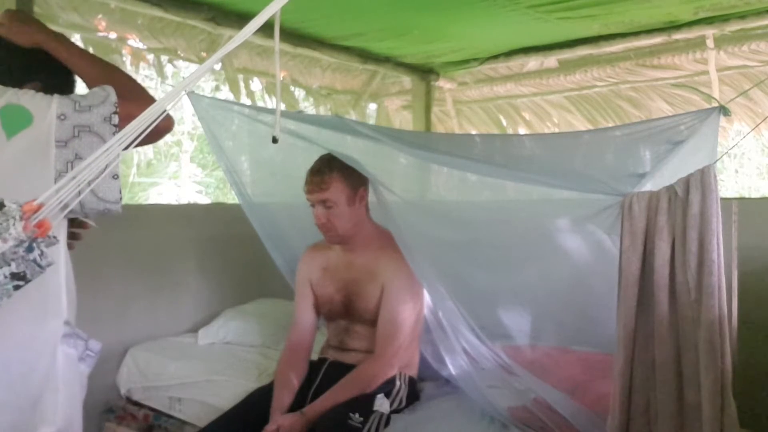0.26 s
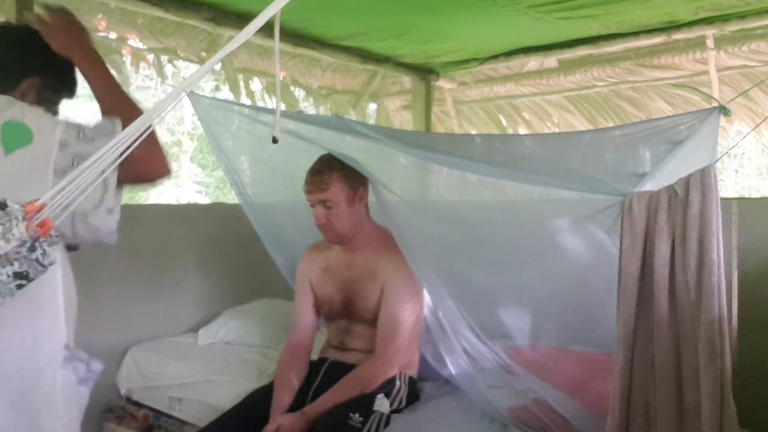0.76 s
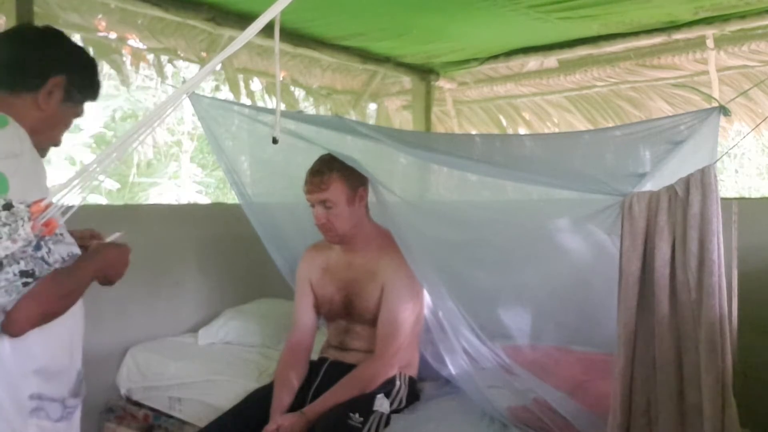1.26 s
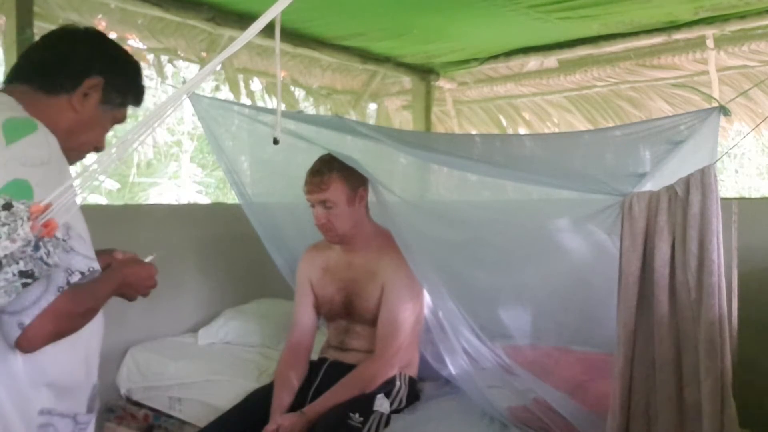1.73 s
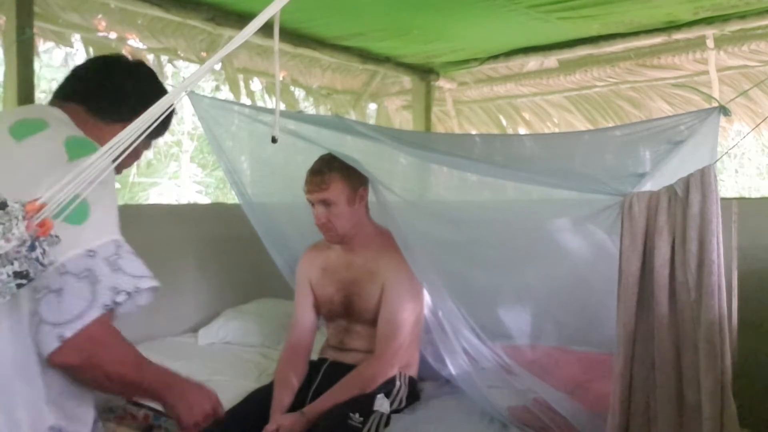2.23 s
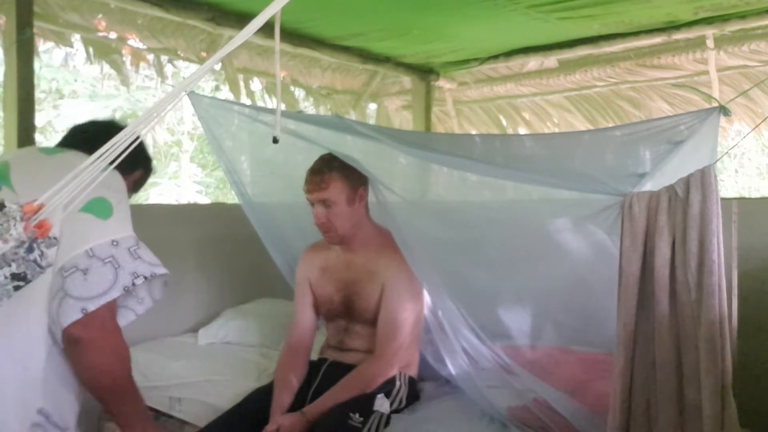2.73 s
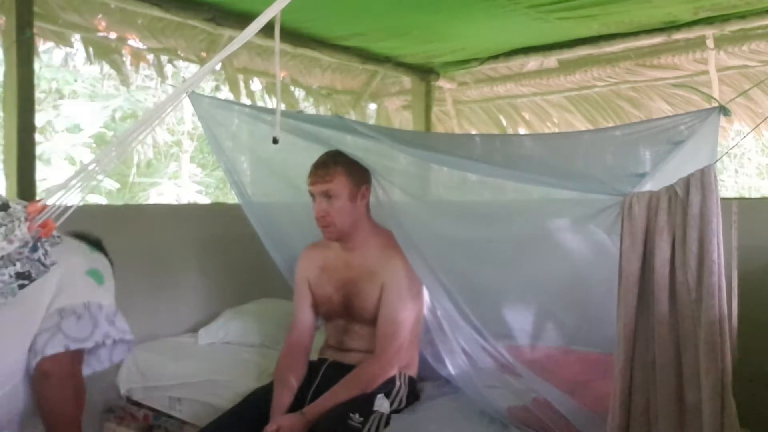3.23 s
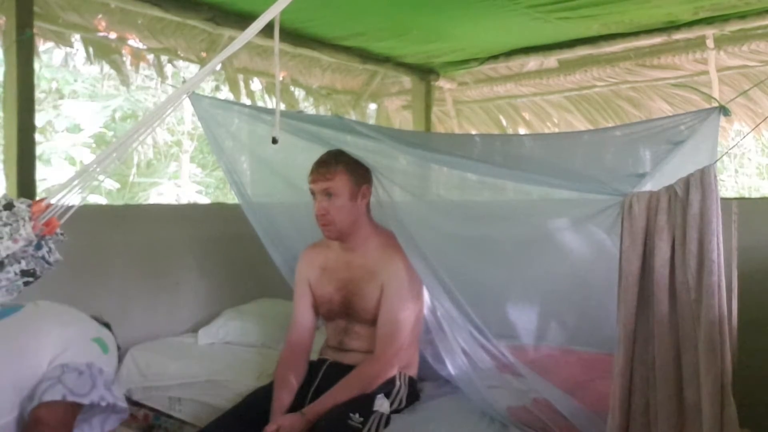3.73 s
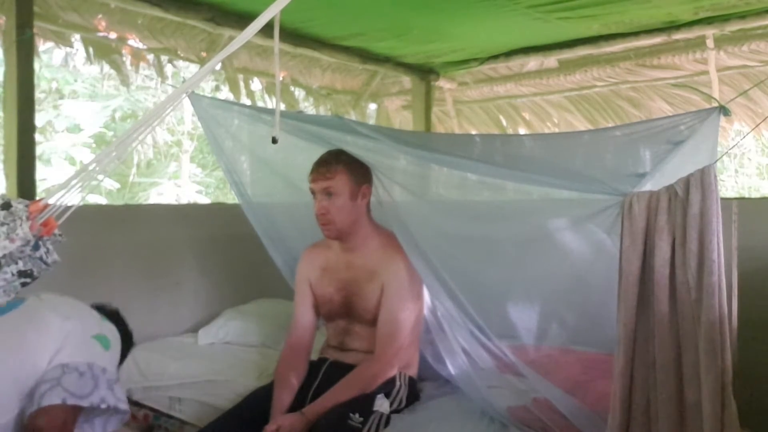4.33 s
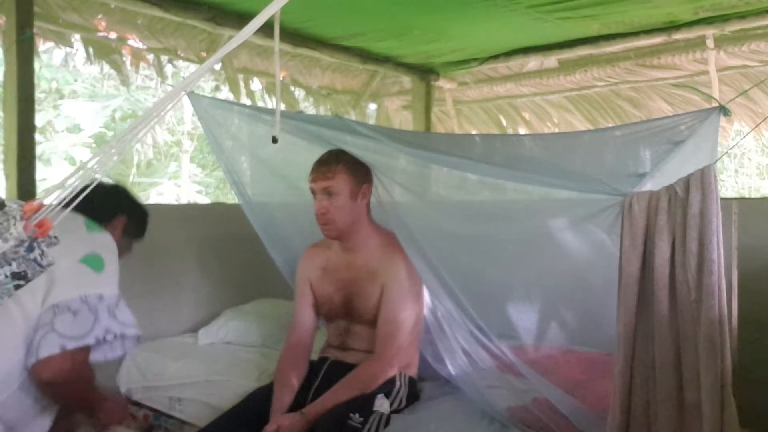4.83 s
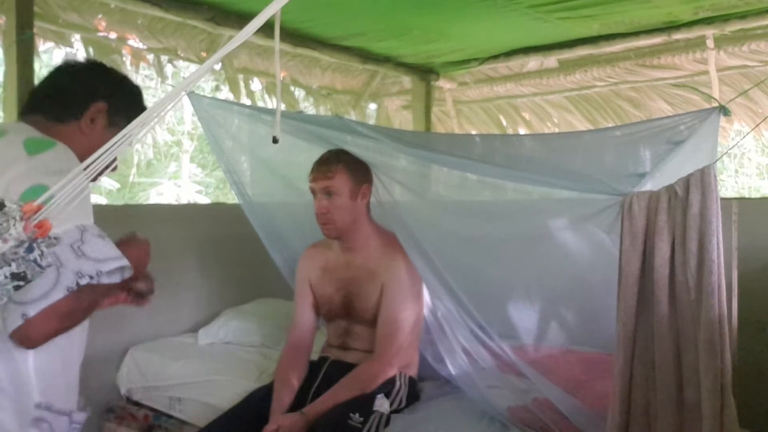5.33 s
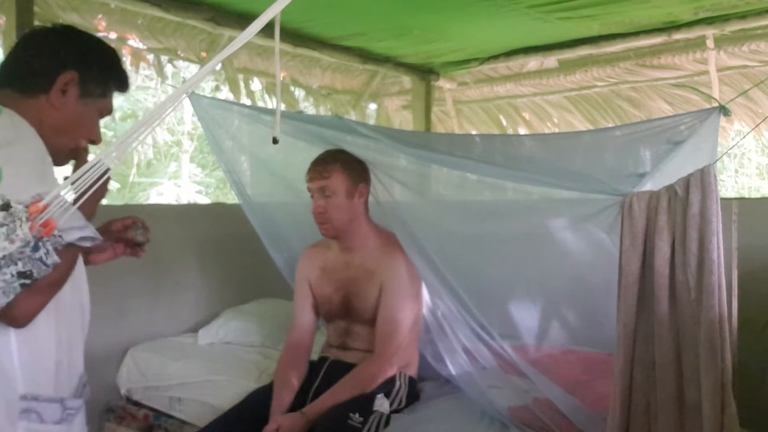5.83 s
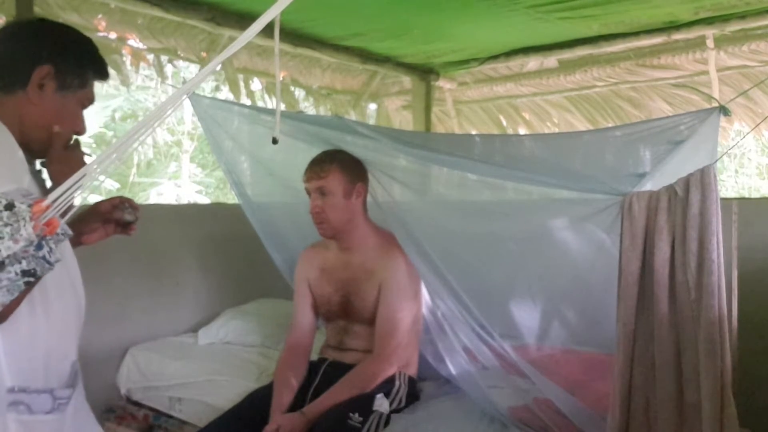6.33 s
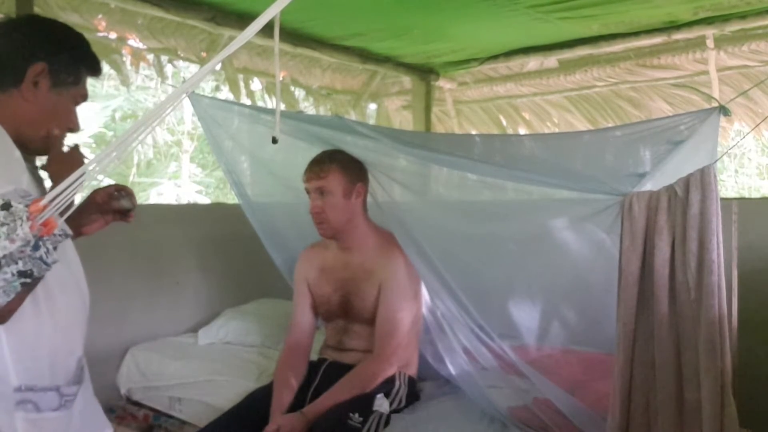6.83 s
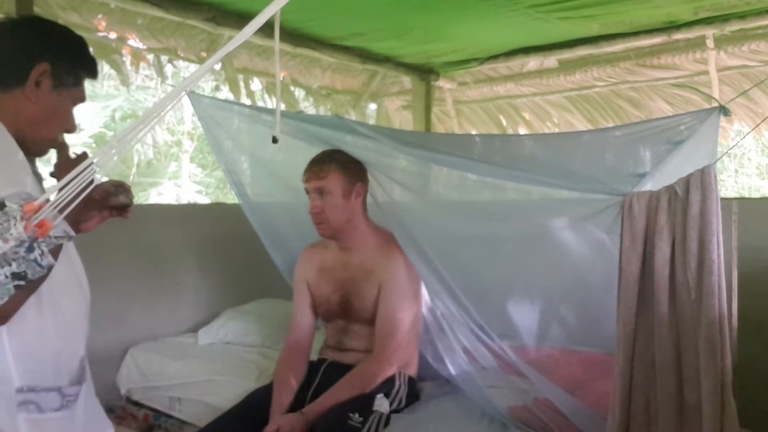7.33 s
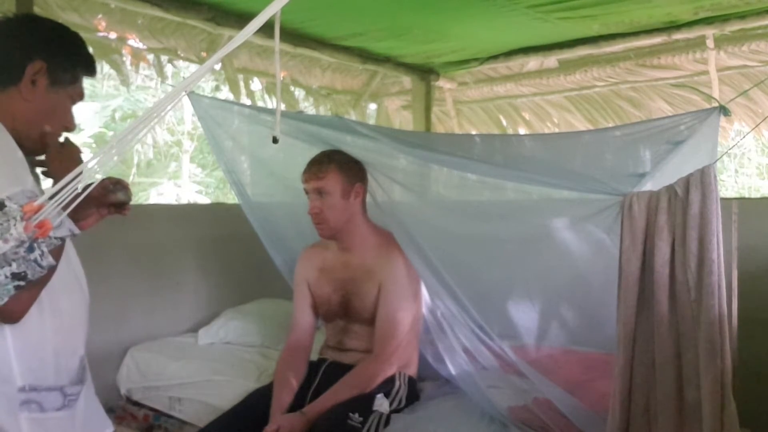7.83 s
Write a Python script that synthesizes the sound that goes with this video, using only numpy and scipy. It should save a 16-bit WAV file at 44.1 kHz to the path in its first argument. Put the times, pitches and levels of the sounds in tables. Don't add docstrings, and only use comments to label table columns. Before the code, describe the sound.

Continuous jungle ambience: low lumpy wind, a smooth band of cicadas, faint throbbing katydids and hissing leaves. Over it, half-second high cricket trills repeat, leaning left, with scattered weaker replies. Quiet frog peeps and far birds are blurred by trees. Occasional gritty footsteps make wooden planks boom dully, loudest near five and a half seconds, with tiny creaks. Wide stereo, unpolished, captured from within the hut.

```python
import sys
import numpy as np
from scipy import signal
from scipy.fft import rfft, irfft
from scipy.io import wavfile
from scipy.ndimage import uniform_filter1d

SR = 44100
rng = np.random.default_rng(int(sys.argv[2]) if len(sys.argv) > 2 else 0)


def unload_wav(signal):
    wavfile.write(
        sys.argv[1],
        SR,
        np.round(np.clip(np.atleast_2d(signal).T, -1, 1) * 32767).astype(np.int16),
    )


def makeup_ratio(level_db):
    decades = np.asarray(level_db, float) / 20
    return 10 ** decades


N = 355446


def evened(x):
    return x / np.sqrt(np.mean(x ** 2) + 1e-20)


def read(points, hz):
    f, value = np.transpose(points)
    return np.interp(np.log(hz + 1), np.log(f + 1), value)


def along(rows, t):
    s, *columns = np.transpose(rows)
    return [np.interp(t, s, c) for c in columns]


def add(mix, s, sound):
    at = round(s * SR)
    sound = sound[:, max(-at, 0):]
    part = mix[:, max(at, 0):][:, :sound.shape[1]]
    part += sound[:, :part.shape[1]]


def resonate(x, hz, width_hz):
    turn = np.exp(2j * np.pi * np.cumsum(hz * np.ones(x.shape[-1])) / SR)
    r = np.exp(-np.pi * width_hz / SR)
    smooth = signal.lfilter([(1 - r) ** 2], [1, -2 * r, r * r], x / turn + 1e-18)
    return 2 * (turn * smooth).real


def beats(turns, sharp):
    return evened(np.exp(sharp * np.cos(2 * np.pi * turns)))


# pitch_hz, likeness (1 = same at both ports)
LIKENESS = [(60, 0.98), (130, 1), (290, 0.83), (640, -0.0036), (1410, -0.1), (3100, 0.00023),
            (6820, -0.095), (15000, 0.028)]
# pitch_hz, left_db
LEFT_LEAN = [(60, 2.9), (130, 2.8), (290, 1.3), (640, 1.0), (1410, 3), (3100, 3.0), (6820, 3.7),
             (15000, 3.2)]


def hiss(colour, patchy_db, size):
    hop, hz = size // 4, np.fft.rfftfreq(size, 1 / SR)
    a, b, c, d, patches = rng.standard_normal((N // hop + 5, len(hz), 5)).T
    patches = uniform_filter1d(patches, size=12, axis=0)
    patches = evened(uniform_filter1d(patches, size=14, axis=1))
    same = np.clip(read(LIKENESS, hz), -1, 1)[:, None]
    left = a + 1j * b
    right = same * left + np.sqrt(1 - same ** 2) * (c + 1j * d)
    z = np.array([left, right / makeup_ratio(read(LEFT_LEAN, hz))[:, None]])
    z = z * makeup_ratio(read(colour, hz)[:, None] + patchy_db * patches)
    x = signal.istft(z, nperseg=size, noverlap=size - hop)[1][:, :N]
    return x / np.sqrt(np.mean(x.mean(0) ** 2))


def phrase(s, length, db, hz, *overtone_db, left_db=5., rise_s=.06, fall_s=.04, edge_db=-9.,
           scoop_hz=0., swell_db=0.):
    end = (left_db, *overtone_db)
    return [(s, db + edge_db, hz - scoop_hz, *end),
            (s + rise_s, db, hz, *end),
            (s + length - fall_s, db + swell_db, hz, *end),
            (s + length, db + edge_db, hz, *end)]


def call(rows, width_hz, pulse_hz=50., sharp=0., syllable_hz=12., stress=0., dip_hz=0., clean=.3, gain_db=0.):
    t = np.arange(rows[0][0], rows[-1][0], 1 / SR)
    level_db, hz, pan_db, *overtone_db = along(rows, t)
    syllables = syllable_hz * (t - t[0]) - .4
    hz = hz - dip_hz * np.cos(2 * np.pi * syllables)
    sound = 0
    for k, db in enumerate([0] + overtone_db, start=1):
        scattered = evened(resonate(rng.standard_normal((2, len(t))), k * hz, k * width_hz))
        tone = np.sqrt(2) * np.sin(2 * np.pi * (k * np.cumsum(hz) / SR + rng.random((2, 1))))
        sound = sound + makeup_ratio(db) * evened(clean * tone + (1 - clean) * scattered)
    sound = sound * beats(pulse_hz * t, sharp) * beats(syllables, stress)
    sound = sound * signal.windows.tukey(len(t), .15)
    return t[0], sound * makeup_ratio(level_db + gain_db + np.outer([.5, -.5], np.clip(pan_db, -9, 12)))


# time_s, level_db
GUSTS = [(0.0, -45.5), (0.27, -50), (0.69, -46), (0.74, -48.5), (1.12, -46), (1.3, -49.5), (3.32, -47.5),
         (3.39, -44.5), (3.64, -48), (3.68, -43.5), (3.72, -50.5), (3.86, -46.5), (6.37, -49), (6.8, -47),
         (7.25, -53), (7.27, -46.5), (8.04, -51), (8.06, -52)]
# pitch_hz, density_db (per Hz)
RUMBLE = [(12, -34), (20, -27.5), (51, -1), (70, 5.5), (85, 8), (107, -5.5), (135, 0.5), (228, -12.5),
          (267, -13), (420, -35.5), (499, -38), (543, -47.5), (600, -45), (780, -50.5), (1320, -120)]


def wind(t, split_hz=105):
    gust_db = along(GUSTS, t)[0]
    gust_db = gust_db - gust_db.mean()
    spectrum = rfft(hiss(RUMBLE, patchy_db=0.3, size=4096))
    deep = irfft(spectrum * (np.fft.rfftfreq(N, 1 / SR) < split_hz), N)
    upper = irfft(spectrum, N) - deep
    deep = makeup_ratio(-50.5 + 1.2 * gust_db) * deep / deep.mean(0).std()
    upper = makeup_ratio(-52 + 0.6 * gust_db) * upper / upper.mean(0).std()
    return np.minimum(t / 0.0027, 1) * (deep + upper)


# time_s, level_db
CHORUS = [(0.0, -51.5), (0.61, -50.5), (6.8, -51), (7.07, -52.5), (7.34, -49.5), (7.63, -52.5), (7.79, -50),
          (8.06, -51)]
# pitch_hz, density_db (per Hz)
DRUMS = [(1940, -76), (3300, -37.5), (3360, -32), (3900, -24.5), (4200, -13.5), (4440, -2), (4740, 1),
         (5060, 2.5), (5440, 3), (5690, 2), (6090, -6.5), (6430, -18.5), (6700, -15), (7950, -47),
         (8100, -73), (14700, -120)]


def cicadas(t):
    return makeup_ratio(along(CHORUS, t)[0]) * hiss(DRUMS, patchy_db=0.5, size=512)


# pitch_hz, density_db (per Hz)
WINGS = [(6300, -27.5), (6600, -2.5), (7200, 7.5), (7800, 7.5), (7950, -23), (8050, -26)]


def katydids(t, level_db=-68.5, strokes_hz=17):
    throb = 0.89 + 0.11 * beats(strokes_hz * t, sharp=2.2)
    return makeup_ratio(level_db) * hiss(WINGS, patchy_db=-0.7, size=512) * throb


# time_s, level_db
AIR = [(0.0, -78), (0.4, -79.5), (0.78, -78), (1.57, -78), (2.29, -78), (2.58, -78), (3.79, -75.5),
       (4.76, -79), (5.75, -76), (5.95, -78), (6.58, -78), (6.98, -78.5), (7.3, -77.5), (8.06, -79)]
# pitch_hz, density_db (per Hz)
LEAVES = [(300, -12), (500, 6), (900, 4), (2700, 3.5), (4000, 1.5), (7900, 2), (8100, -26), (8800, -16),
          (9000, 6.5), (9500, 10), (9950, 11), (10300, 1), (11300, 5), (12000, 0), (14000, 2),
          (16000, -0.5)]


def leaves(t):
    return makeup_ratio(along(AIR, t)[0] + 1.5) * hiss(LEAVES, patchy_db=1.37, size=1024)


# start_s, length_s, level_db
CRICKET = [
    (-.25, 0.54, -54),
    (0.901, 0.44, -52),
    (1.908, 0.64, -56.5),
    (3.13, 0.63, -54),
    (4.336, 0.53, -53.5),
    (5.479, .52, -54.5),
    (6.461, 0.59, -53.5),
    (7.785, .55, -56.5),
]


def near_cricket():
    out = np.zeros((2, N))
    for s, length, db in CRICKET:
        rows = phrase(s, length, db, 7016, left_db=10, rise_s=.13, edge_db=-12., scoop_hz=130, swell_db=-2.5)
        add(out, *call(rows, 99.0, pulse_hz=54., sharp=0.35, syllable_hz=18.17, stress=0.18,
                       clean=0.47, gain_db=-7.0))
    return out


# start_s, length_s, level_db
HIGH_KATYDID = [
    (0.505, .65, -84.5),
    (1.6, .85, -85.5),
    (2.702, 1.6, -89),
    (4.354, .9, -86),
    (6.304, .3, -89),
    (7.05, .45, -90),
]


def high_katydid():
    out = np.zeros((2, N))
    for s, length, db in HIGH_KATYDID:
        add(out, *call(phrase(s, length, db, 10950., left_db=10.0), 800., clean=0.))
    return out


# start_s, length_s, level_db, pitch_hz
ANSWER = [(.55, .33, -76, 7020), (1.34, .58, -72, 7020), (1.34, .3, -74, 7120), (2.5, .25, -74, 7020),
          (2.58, .35, -74, 7130), (3.7, .38, -73, 7190), (3.88, .42, -72, 7020), (4.4, .45, -75, 7210),
          (5.1, .38, -71, 7020), (5.08, .62, -76, 7150), (6.31, .45, -72, 7170), (7.03, .7, -72, 7020),
          (7.48, .45, -74, 7180), (.58, .27, -80, 6700), (4.82, .2, -80, 6700), (6.02, .3, -78, 6680),
          (7.2, .36, -79, 6680)]


def answering_crickets():
    out = np.zeros((2, N))
    for row in ANSWER:
        rows = phrase(*row, left_db=8.0, edge_db=-4.0)
        add(out, *call(rows, 81.0, pulse_hz=55.5, sharp=0.47, clean=0.27, gain_db=4.0))
    return out


# start_s, level_db, length_s, body_hz, scrape_db
STEPS = [(1.082, -73.5, 0.05, 1030, -11), (1.694, -81, 0.055, 603, -10), (2.777, -62.5, 0.095, 600, -16),
         (2.791, -68.5, 0.067, 1250, -4), (2.926, -70.5, 0.044, 620, -14), (3.553, -74.5, 0.067, 990, -12),
         (3.753, -75.5, 0.27, 494, -12), (5.017, -70.5, 0.09, 636, -19), (5.205, -74.5, 0.057, 1800, -18),
         (5.513, -57.5, 0.085, 542, -4.5), (5.527, -50, .06, 300, -30), (5.786, -70, 0.053, 486, -13),
         (2.052, -98, 0.071, 2000, 17), (2.12, -101, .38, 2000, 18), (0.894, -104, 0.46, 2000, 11)]
# ratio (of body_hz), level_db, width (share of mode pitch)
PLANK = [(.55, 3.5, 0.32), (1., 4.5, 0.39), (1.6, -6.5, 0.12), (2.6, -13, 0.29), (3.6, -14, 0.076)]


def steps():
    out = np.zeros((2, N))
    for s, db, length, hz, scrape_db in STEPS:
        u = np.arange(0, 1.6 * length, 1 / SR) / length
        clicks = makeup_ratio(1.2 * rng.exponential(1, len(u) // 64 + 1)).repeat(64)[:len(u)]
        grit = rng.standard_normal((3, len(u))) * (0.44 + clicks)
        grit = grit[1:] + 1.1 * grit[0]
        body = sum(makeup_ratio(mode_db) * evened(resonate(grit, k * hz, share * k * hz)) for k, mode_db, share in PLANK)
        shoulder = signal.lfilter([1], [1, -.85], grit)
        scrape = np.diff(grit, axis=1, prepend=0)
        rough = makeup_ratio(-15.5) * evened(shoulder) + makeup_ratio(scrape_db) * evened(scrape)
        sound = evened(body) + rough * np.exp(-(u / 1.3) ** 3)
        envelope = np.minimum(u / 0.11, 1) * np.exp(-(u / 0.92) ** 3)
        add(out, s, makeup_ratio(db) * sound * envelope * makeup_ratio([[1.2], [-1.2]]))
    return out


# start_s, syllables, level_db
FROG = [
    (1.337, 4, -71),
    (3.797, 6, -71),
    (6.828, 5, -72),
]


def frog(syllables_hz=11.95):
    out = np.zeros((2, N))
    for s, count, db in FROG:
        rows = phrase(s, count / syllables_hz + .015, db, 3162, left_db=7.5, rise_s=0.17, fall_s=.02,
                      edge_db=-5.5, swell_db=.7)
        add(out, *call(rows, 75., pulse_hz=60.5, sharp=0.5, syllable_hz=syllables_hz, stress=0.5,
                       dip_hz=36., clean=0.55))
    return out


# start_s, length_s, level_db, pitch_hz, octave_db
BIRDS = [
    (2.229, .2, -86.5, 1770, 11.5),
    (2.555, 0.22, -78.5, 1780, 8.5),
    (6.902, 0.31, -85, 2250, -6),
    (7.23, 0.22, -79, 2030, 3),
    (7.608, 0.12, -80, 1950, -9),
    (7.918, 0.18, -85, 2020, -4),
]
# start_s, length_s, level_db, pitch_hz, octave_db
TRILL = (3.5, .69, -77, 1740, -17)


def birds():
    out = np.zeros((2, N))
    for row in BIRDS:
        rows = phrase(*row, left_db=4.0, rise_s=0.064, fall_s=0.1, edge_db=-8., scoop_hz=61.0)
        add(out, *call(rows, 110., pulse_hz=44., sharp=0.12, clean=.12, gain_db=0.5))
    rows = phrase(*TRILL, rise_s=.22, fall_s=.05, edge_db=-4., swell_db=-3.)
    add(out, *call(rows, 210.0, pulse_hz=89.0, sharp=0.22, clean=0.11, gain_db=4.0))
    return out


# start_s, length_s, level_db, pitch_hz
CREAK = [
    (4.1, .11, -73, 503),
    (5.227, .14, -70, 937),
    (5.223, .12, -74, 1270),
]


def creaks():
    out = np.zeros((2, N))
    for row in CREAK:
        rows = phrase(*row, rise_s=.015, fall_s=.05, edge_db=-8.)
        add(out, *call(rows, 110.0, pulse_hz=31.1, sharp=0.45, clean=.35))
    return out


def scene():
    t = np.arange(N) / SR
    ambience = wind(t) + cicadas(t) + katydids(t) + leaves(t)
    insects = near_cricket() + high_katydid() + answering_crickets()
    return ambience + insects + steps() + frog() + birds() + creaks()


def roll_off(x):
    return signal.sosfilt(signal.butter(12, 15750, fs=SR, output="sos"), x)


def record(dry):
    return roll_off(dry)


dry = scene()
out = record(dry)
unload_wav(out)
```